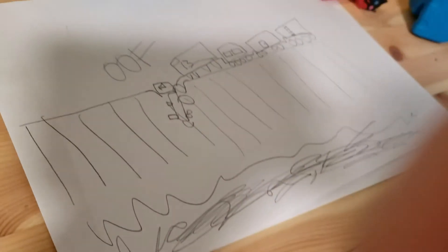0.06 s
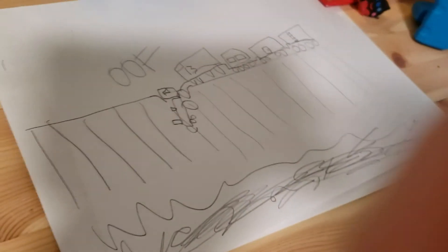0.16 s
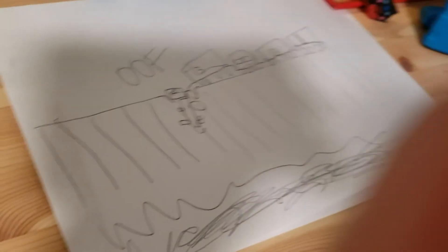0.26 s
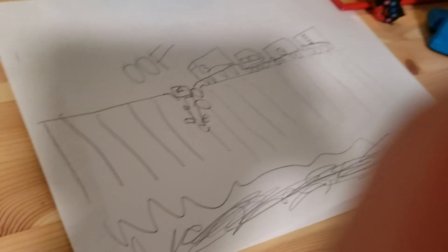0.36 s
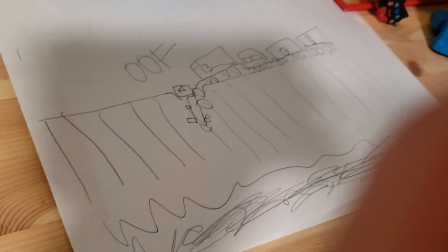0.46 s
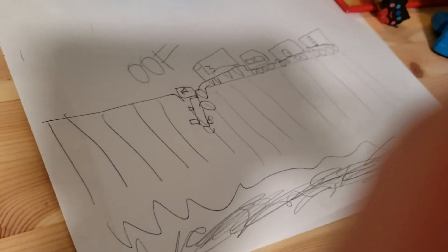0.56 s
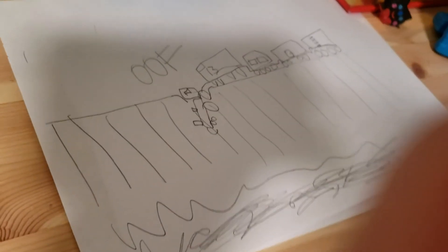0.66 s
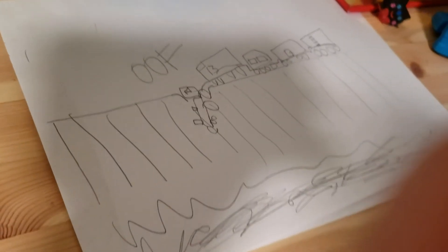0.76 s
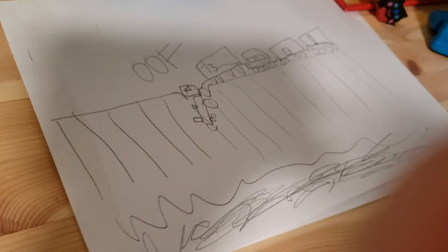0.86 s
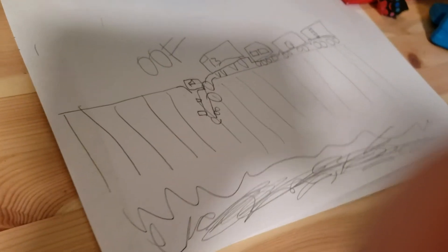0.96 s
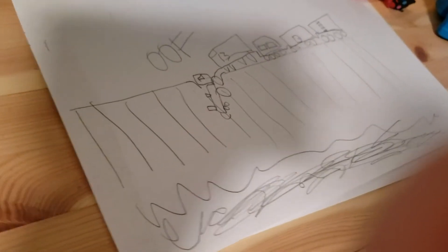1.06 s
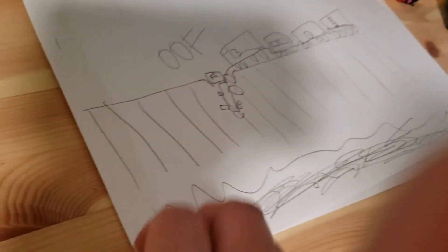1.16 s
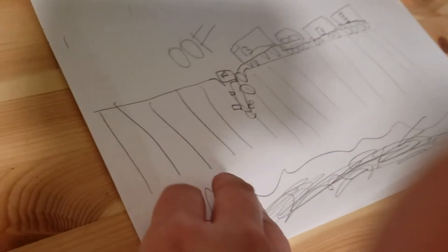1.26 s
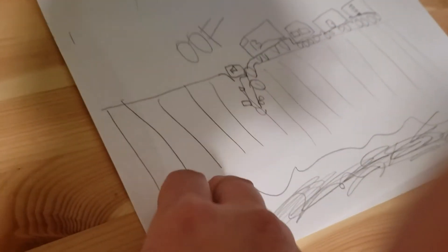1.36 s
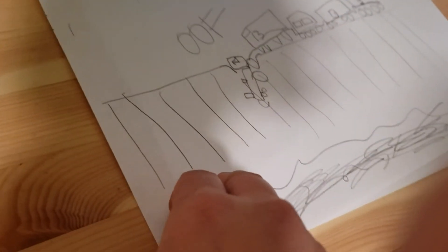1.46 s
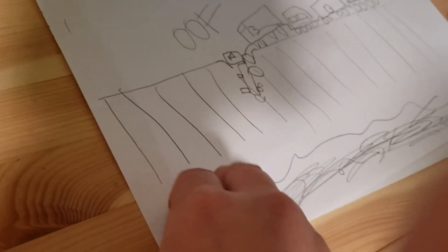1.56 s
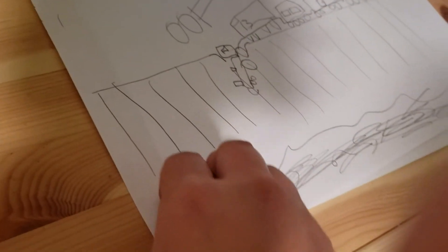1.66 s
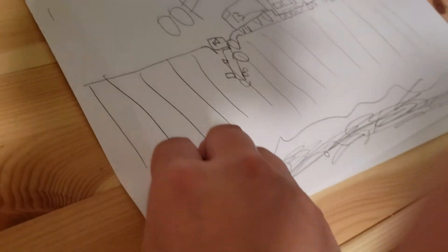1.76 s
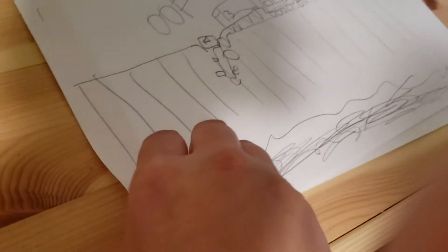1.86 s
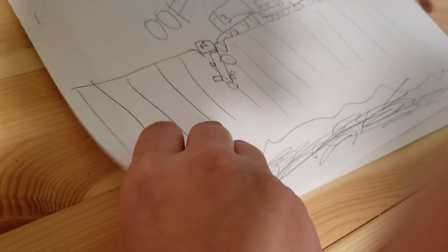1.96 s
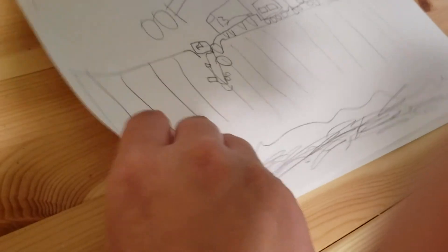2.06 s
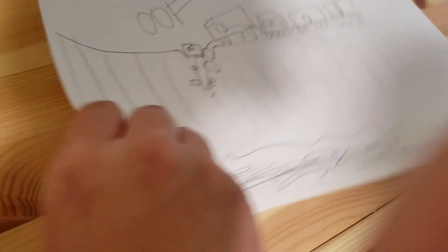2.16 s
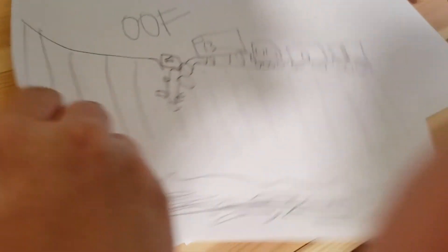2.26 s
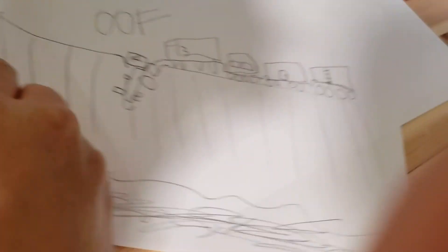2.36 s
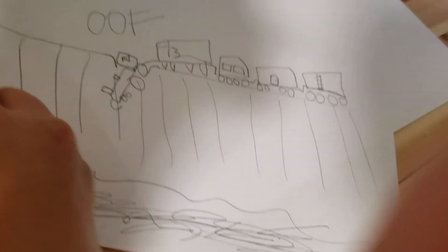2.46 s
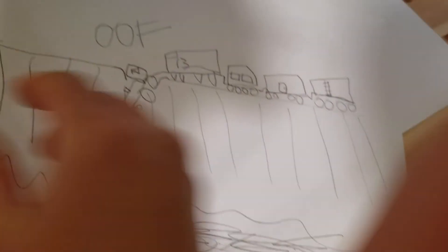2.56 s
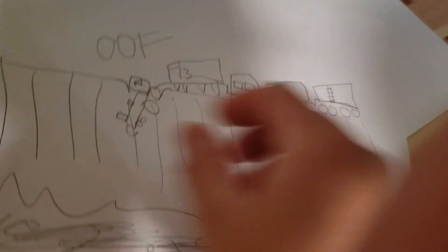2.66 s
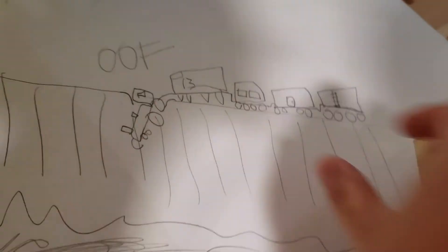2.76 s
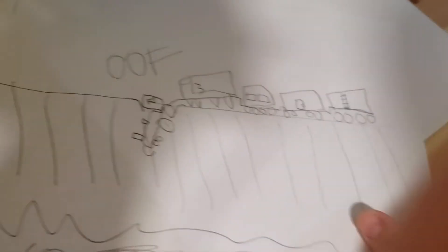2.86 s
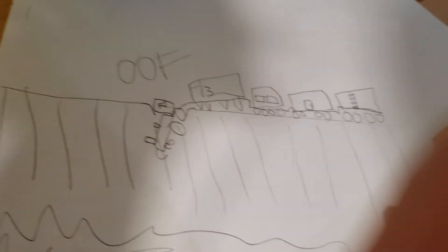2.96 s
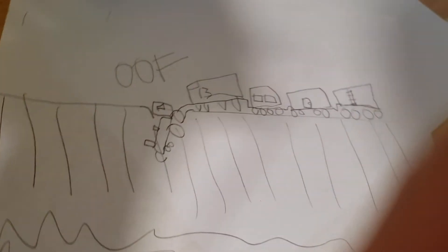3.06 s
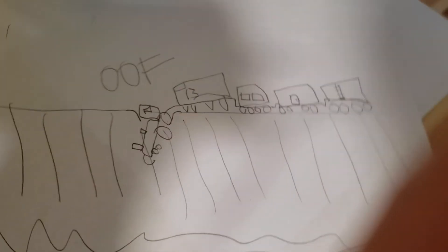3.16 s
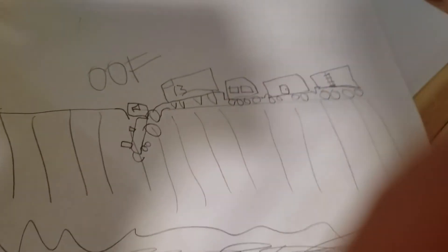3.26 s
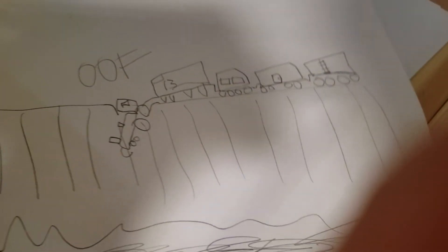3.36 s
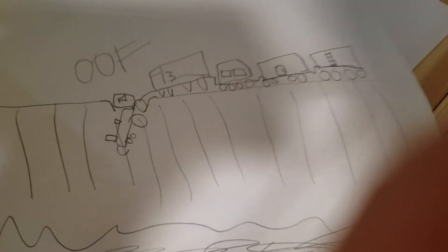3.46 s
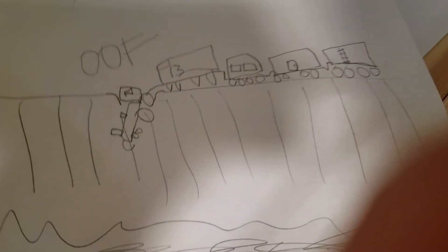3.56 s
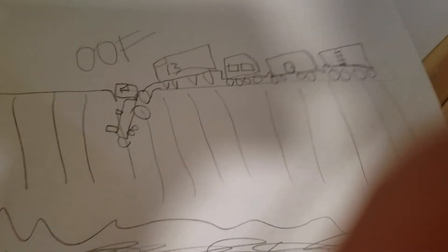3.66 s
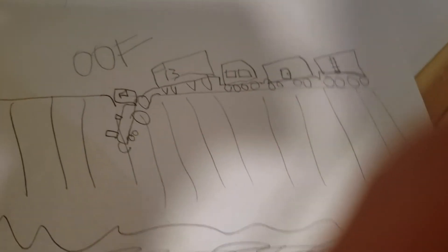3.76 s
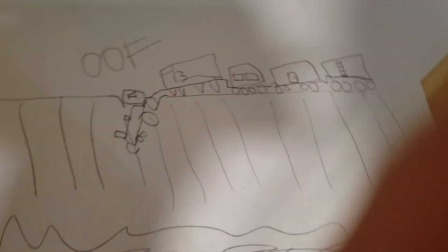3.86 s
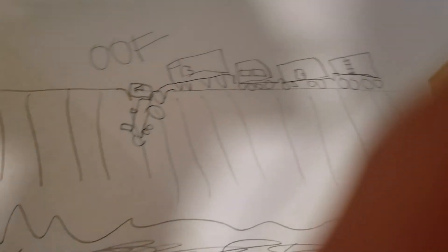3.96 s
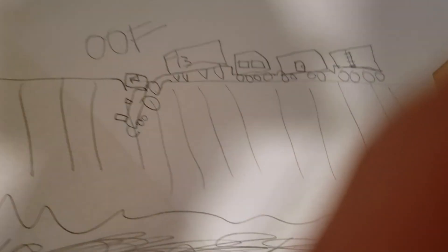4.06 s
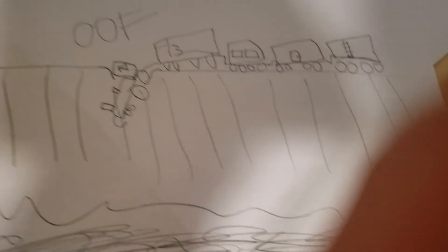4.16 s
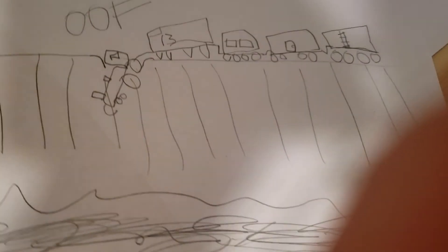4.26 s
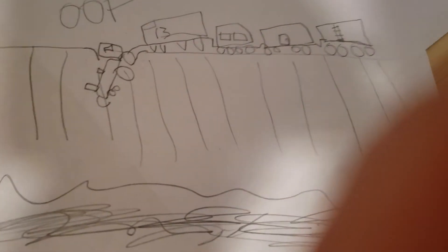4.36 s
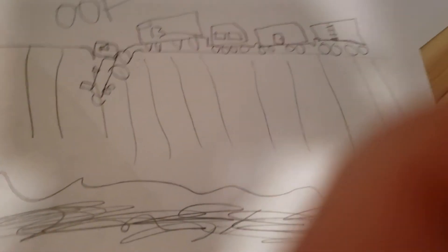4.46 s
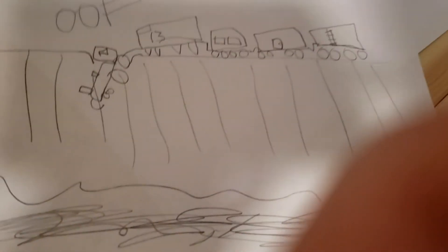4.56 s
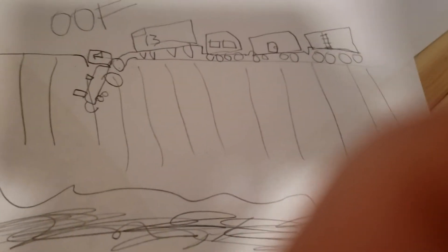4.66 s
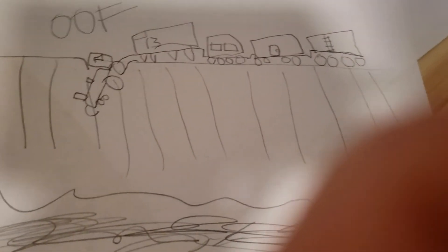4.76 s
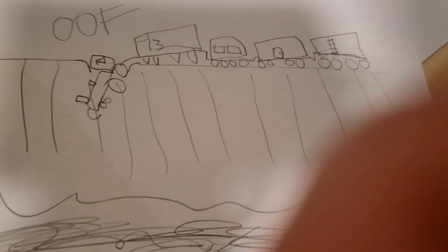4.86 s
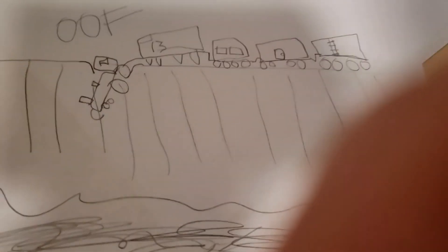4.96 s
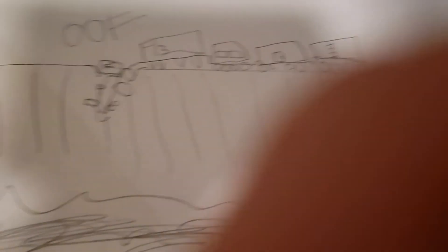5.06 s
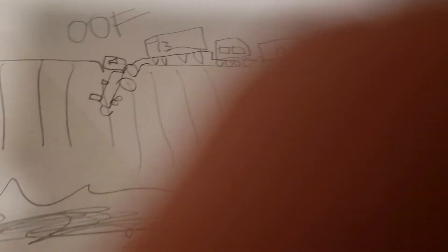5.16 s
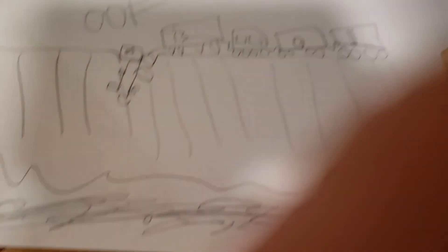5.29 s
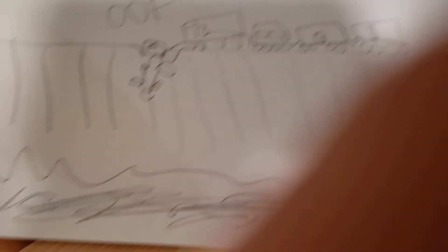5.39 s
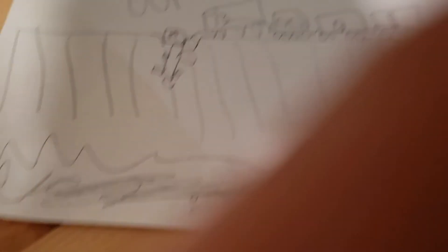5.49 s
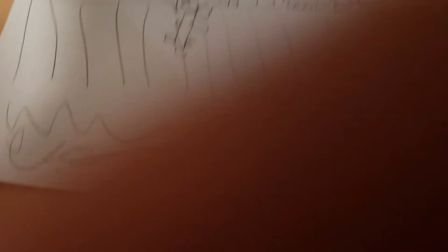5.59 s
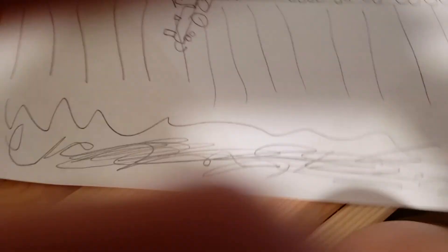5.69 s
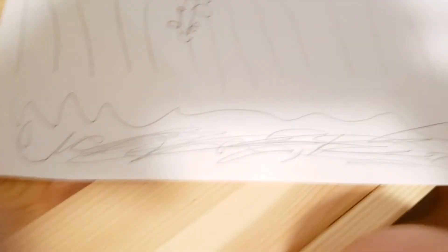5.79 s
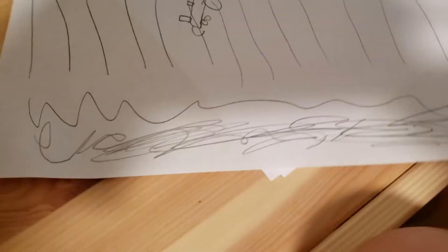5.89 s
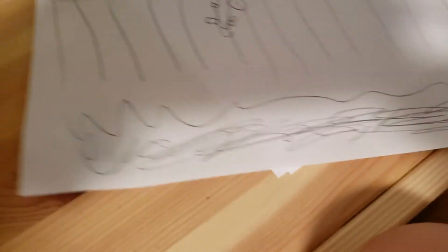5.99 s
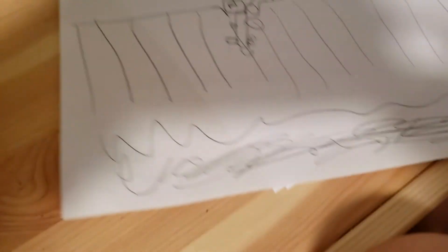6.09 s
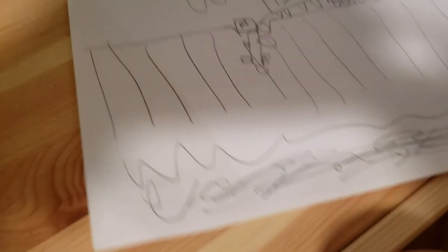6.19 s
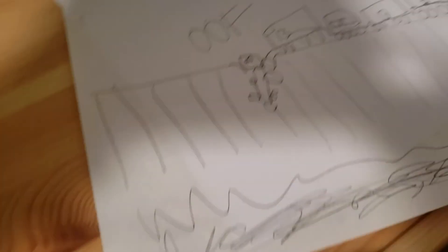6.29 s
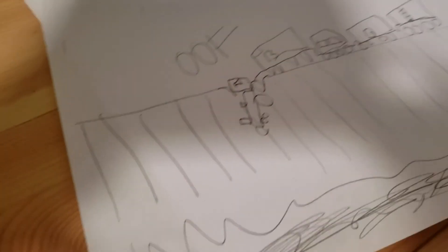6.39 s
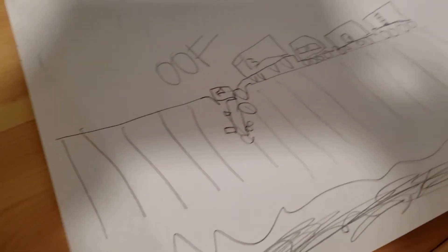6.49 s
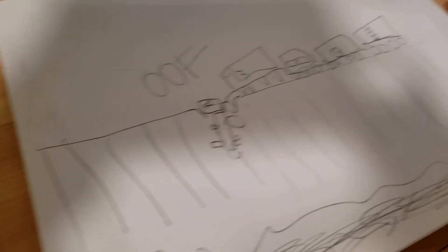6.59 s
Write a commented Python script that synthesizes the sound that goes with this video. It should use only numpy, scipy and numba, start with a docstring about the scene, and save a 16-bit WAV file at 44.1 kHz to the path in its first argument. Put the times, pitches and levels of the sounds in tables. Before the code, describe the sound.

In a quiet room, a sheet of paper lies almost silent on a wooden table, then dull knocks start and the sheet slides. Sharp crisp snaps follow as it is lifted and turned, then softer rubbing. Later come heavy thumps, louder dragging and one strong scrape, with crinkling to the end. Very close hand-held stereo microphone: paper mostly left, grip noises mostly right.

```python
"""In a quiet room a sheet of paper is dragged, lifted and turned on a wooden table, close to a hand-held recorder.
After a faint start, knocks come from 1 s and sharp snaps of the sheet around 2 to 2.6 s; softer rubbing follows.
The heaviest knocks come near 4.7 s, the strongest scrape near 5.7 s, and sliding and crinkling go on to the end.
The left port hears the sheet and fingertips: friction is many tiny clicks, snaps are short noise bursts.
The right port lies under the holding hand: the grip creeps (low friction) and knocks make the case ring."""
import sys
import numpy as np
from scipy import signal
from scipy.fft import rfft, irfft, next_fast_len
from scipy.io import wavfile
from numba import njit

SR = 44100
rng = np.random.default_rng(int(sys.argv[2]) if len(sys.argv) > 2 else 0)


def store_pcm(level_fs):
    """Save levels as 16-bit WAV."""
    pcm = np.round(np.clip(level_fs, -1, 1) * 32767).astype(np.int16)
    wavfile.write(sys.argv[1], SR, np.atleast_2d(pcm).T)


N = 292546   # length in samples
PADDED = next_fast_len(N)
BINS_HZ = np.maximum(np.arange(PADDED // 2 + 1) * SR / PADDED, 1)

# Room tone and microphone hiss: (frequency [Hz], left [dB per Hz], right [dB per Hz])
ROOM_SPECTRUM = [(25, -110, -108), (60, -93, -97.5), (124, -89, -93.5), (246, -88, -89),
                 (378, -94.5, -94.5), (696, -99, -101), (950, -107, -105), (1600, -106, -113),
                 (2780, -113, -118), (5500, -119, -123), (8170, -122, -128), (10940, -120, -116),
                 (14000, -114, -116), (14600, -110, -115)]
# How alike the room is at both ports: (frequency [Hz], likeness [0 to 1])
ROOM_LIKENESS_CURVE = [(60, 0.88), (130, 1), (290, 0.92), (640, 0.32), (1200, 0), (16000, 0.14)]

# Colours of friction, as relative levels: (frequency [Hz], left [dB], right [dB])
# the palm's low rumble
THUD_SPECTRUM = [(25, -49.5, -36), (44.5, -27, 6.5), (63.6, -40, 11), (120, -27, 6.5), (176, -47.5, -2),
                 (300, -50.5, -47.5)]
# the palm's creak
CREAK_SPECTRUM = [(113, -28, 0.5), (221, -23, 7.5), (377, -46, 2), (665, -17.5, -4), (990, -36, -9.5),
                  (1340, -65, -23.5), (2590, -40.5, -66)]
# the whole sheet dragging
DRAG_SPECTRUM = [(60, -43.5, -56.5), (241, -12.5, -30), (347, -1, -30), (415, -0.5, -41.5), (490, 0, -20),
                 (670, 0.5, -38), (776, -2.5, -10.5), (920, -1.5, -15.5), (1280, -11, -32.5),
                 (1830, -40.5, -48)]
# paper and skin scraping
SCRAPE_SPECTRUM = [(895, -27.5, -7.5), (1420, -9.5, -2), (1610, -5, -14.5), (1810, -2.5, 8),
                   (2140, -4, -0.5), (2420, -5, -4.5), (2860, -4.5, 3), (3240, -8.5, 2.5),
                   (3490, -10.5, -6), (3900, -11, -0.5), (4700, -10, -15), (6500, -18, -5),
                   (7880, -49, -33), (12000, -50.5, -53)]
# a fuller rub near the left port
RUB_SPECTRUM = [(647, -16.5, -1.5), (1000, -2.5, 3), (1350, -3, -9.5), (1360, -2.5, -0.5),
                (2170, -1.5, -0.5), (2630, -6, -1.5), (3220, -5.5, -5), (3800, -8.5, -10.5),
                (4860, -7.5, -12), (7000, -15, -25.5), (9000, -23.5, -45.5), (13040, -49, -54.5)]
# bright hiss of tiny creases
HISS_SPECTRUM = [(2500, -39, -48.5), (3170, -7, -21), (3900, -0.5, -16.5), (4970, -2.5, -11.5),
                 (6240, -2, -10), (8800, -1.5, -16.5), (9120, -5.5, -2), (11520, -4.5, 2.5),
                 (13700, -6, -1), (16740, 3, -7)]

# Grip shifting on the case, levels at the louder port; rise and fall span 20 dB:
# (time [s], rise [s], fall [s], thud [dB], creak [dB])
GRIP_SHIFTS = [(.394, 0.033, 0.05, -90, -57.5), (1.019, .003, 0.2, -27, -44.5),
               (1.137, 0.055, 0.068, -34, -32), (1.228, 0.058, 0.0087, -47, -43.5),
               (1.349, 0.0026, 0.097, -39, -62), (1.412, 0.13, .06, -48, -42),
               (1.92, 0.29, 0.12, -77, -49.5), (2.15, .004, 0.13, -43, -44), (2.36, 0.025, .08, -41, -58),
               (2.439, .15, 0.089, -56, -36.5), (2.553, 0.087, 0.035, -49, -42.5),
               (2.684, 0.0036, 0.046, -40, -64), (2.719, 0.026, 0.053, -56, -37.5),
               (2.943, 0.022, 0.067, -73, -51), (3.55, 0.21, .05, -66, -55),
               (3.622, 0.21, 0.079, -53.5, -41.5), (3.745, 0.064, 0.065, -33.5, -26),
               (4.076, .04, 0.025, -62, -68), (4.161, 0.057, .25, -62, -56.5), (4.34, .07, .17, -62, -56.5),
               (4.495, 0.035, 0.11, -64, -59), (4.599, 0.0032, 0.032, -36, -37),
               (4.672, 0.0027, 0.019, -45, -20), (4.737, 0.005, 0.043, -49, -31.5),
               (4.845, .15, 0.018, -42.5, -49.5), (4.937, 0.056, 0.15, -44, -41.5),
               (5.113, 0.045, .05, -42.5, -60), (5.228, 0.043, 0.23, -53, -53),
               (5.387, 0.072, .15, -41, -42), (5.597, .15, 0.079, -51, -63), (5.667, .035, .3, -45, -54),
               (5.78, .1, 0.33, -55, -52), (6.246, 0.19, 0.18, -67, -57.5), (6.465, 0.21, .18, -64, -54),
               (6.56, .004, 0.082, -44, -45.5)]
RESTING_THUD_DB, RESTING_CREAK_DB = -80.5, -80.5

# Knocks on the case, strengths of the striking clicks; each mode group adds its own offset to the left:
# (time [s], thud [dB], bump [dB], knock [dB], crack [dB], left above right [dB],
#  direction of the first swing [+1 or -1])
CASE_KNOCKS = [(1.0252, -25, -10, -59, -60, -31, 1), (1.0626, -35, -46, -15.5, -25, -28, 1),
               (1.0825, -16.5, -32, -45, -60, -26, -1), (1.113, -26, -18.5, -29.5, -46, -20, 1),
               (1.1322, -44, -35, -27.5, -52, -16, 1), (1.14, -34, -43, -39, -55, -14, -1),
               (1.22, -43, -39, -36.5, -53, -16, 1), (1.3464, -34, -65, -22, -19.5, -19, 1),
               (1.383, -47, -51, -36, -50, -8, 1), (2.1501, -44, -53, -32.5, -55, -15, 1),
               (2.1562, -44, -20, -53, -62, -18, -1), (2.372, -57, -52, -22.5, -50, -10, 1),
               (2.6788, -48, -52, -20.5, -46, -12.5, 1), (2.934, -65, -33, -59, -47.5, 6, 1),
               (4.6, -39, -38, -45, -25, -11, 1), (4.672, -30, -3.5, -47, -8.5, -36, 1),
               (4.681, -51, -40, -25, -27, -6, 1), (4.6886, -14.5, -17, -52, -60, -22, 1),
               (4.737, -3.5, -8, -46, -17, -24, -1), (4.937, -18, -20.5, -36, -17, -27, -1),
               (5.379, -39, -47, -42, -47, 4, -1), (6.561, -23, -49, -52, -43, -12, -1)]
# Ringing modes of the case, slow to quick: (frequency [Hz], relative level [dB], time to fall 60 dB [s])
THUD_MODES = [(62.4, -2, 0.069)]
# bump modes, same columns
BUMP_MODES = [(188, 0, 0.016)]
# knock modes, same columns
KNOCK_MODES = [(340, 1.5, 0.027), (466, 0, 0.031), (734, -4.5, 0.026)]
# crack modes, same columns
CRACK_MODES = [(520, 0, 0.0056)]
# tick modes, same columns
TICK_MODES = [(1350, 0, 0.0086), (2250, 8.5, 0.0031), (3940, -14, 0.0053), (5700, -9, 0.0023)]
TICK_DB, TICK_PER_CRACK_DB = -28.5, 0.62   # tick level for a 0 dB crack; tick dB gained per crack dB
FAR_PORT_LAG_S = 0.0013

# Fingernail taps near the left port, click strengths: (time [s], left [dB], right above left [dB])
NAIL_TAPS = [(4.0573, -23, -22), (5.0332, -28.5, -22), (5.729, -18, -32), (6.558, -26.5, -23)]

# Short noise bursts: snaps of the sheet, two of them as the sheet jolts with the knocks near 4.7 s; # the left
# port gets 3 dB on top of these: # (time [s], treble [dB], body above treble [dB], time to fall 60 dB [s], left
# above right [dB])
NOISE_BURSTS = [(1.0167, -51.5, -8, 0.023, 8), (1.968, -25, -16, 0.018, 0), (1.9813, -28.5, -36, 0.062, 3),
                (2.0281, -18, -14, 0.014, 11), (2.0356, -12, -12.5, 0.018, 0.5),
                (2.0482, -37, -13, 0.026, -12), (2.0542, -46, 9, 0.016, 16), (2.3349, -29, -8.5, 0.059, 4),
                (2.416, -51.5, 10, 0.035, -2), (2.4824, -26.5, -8.5, 0.015, 7), (2.497, -36, 3, 0.019, 3.0),
                (2.5614, -18, -21, 0.024, 5.5), (2.592, -32, -15, 0.06, 15), (2.9363, -43, 4, 0.018, 1),
                (2.9642, -53, -22, 0.017, 1), (3.187, -44, -20, 0.057, 0), (3.4339, -46, -15, 0.053, -1),
                (4.387, -60, 8, 0.031, 23), (4.5345, -46.5, 5.5, 0.044, 21), (4.582, -41.5, 2, 0.063, 12),
                (4.6715, -50, 3, 0.012, -6), (4.7367, -53, 3.5, 0.016, -6), (4.985, -48, 10, 0.078, 8),
                (5.2713, -48, 4, 0.039, 22.0), (5.3774, -51, 16, 0.056, 24), (6.556, -47.5, 12, 0.053, 18),
                (6.586, -47.5, 7.5, 0.02, -1)]

# Strokes of sheet and fingers, levels before resonance, echo and flicker; rise and fall span 20 dB:
# (time [s], rise [s], fall [s], hold [s], scrape [dB], drag [dB], hiss [dB],
#  scrape right above left [dB], hiss right above left [dB])
SHEET_STROKES = [(.05, 0.11, .35, 0.074, -96, -96, -66.5, -4, 10),
                 (0.865, .1, 0.26, .03, -96, -96, -87, -4, 21),
                 (1.061, 0.032, 0.066, 0, -51.5, -46, -58.5, -12, 0),
                 (1.16, 0.11, .09, 0.021, -56.5, -54.5, -69, -12, 11),
                 (1.286, .04, 0.11, 0, -85, -80, -73, -10, 17),
                 (1.352, 0.021, 0.14, 0.0075, -57, -51, -71.5, -10, 13),
                 (1.47, .15, .1, 0.24, -58, -61.5, -68, -12, 2.5),
                 (1.774, 0.053, .1, 0.32, -53.5, -60, -50, -9.5, -3.5),
                 (1.959, 0.12, 0.12, 0.01, -49, -53.5, -39, -13, 1),
                 (2.033, 0.01, 0.034, 0.0059, -32.5, -41, -37, -17.5, 13.5),
                 (2.085, 0.18, 0.43, 0.17, -49.5, -63.5, -42.5, -15, 2.5),
                 (2.343, 0.055, 0.11, 0.013, -38.5, -60, -30, -11.5, -1),
                 (2.386, 0.039, 0.11, 0.047, -57, -42.5, -39.5, -11, 5),
                 (2.485, 0.078, 0.067, 0.024, -41, -56, -33.5, -11, -0.5),
                 (2.557, 0.027, 0.043, 0.048, -42.5, -65, -42, -12, -1),
                 (2.688, 0.036, 0.074, 0.017, -72, -52, -75, -10, 13),
                 (2.77, 0.095, 0.057, 0, -90, -82, -65, -10, 14.5),
                 (2.938, .01, .04, 0.0053, -44.5, -49, -47, -3.5, 0),
                 (2.967, 0.0093, 0.095, 0, -53, -60.5, -41.5, -10, -2.5),
                 (3.01, 0.11, .1, 0.34, -85, -99, -54.5, -15, 2.5),
                 (3.198, 0.054, 0.13, 0.095, -56.5, -69.5, -53.5, -18, -3),
                 (3.358, 0.07, 0.052, 0.034, -56.5, -75, -49.5, -16, 3.5),
                 (3.485, 0.05, 0.087, 0.13, -59, -64.5, -58, -20, 3.5),
                 (3.615, 0.21, .08, 0.01, -52, -67, -47, -10, -4.5),
                 (3.751, 0.06, 0.094, 0, -50.5, -40.5, -46.5, -2.5, -5),
                 (3.788, 0.11, .1, 0.33, -55.5, -66, -67, -2.5, 5),
                 (4.101, 0.12, 0.053, 0.15, -43.5, -58, -54.5, -13.5, -5.5),
                 (4.149, 0.06, 0.11, .02, -40.5, -57, -44.5, -11, -15),
                 (4.304, .1, .2, 1.3, -96, -96, -85, -4, 17),
                 (4.395, 0.0091, 0.042, 0.113, -48, -60, -57, -20.5, 0),
                 (4.534, 0.024, 0.037, 0.042, -47.5, -49.5, -59, -25, 9.5),
                 (4.497, 0.11, .02, 0.0049, -41, -45.5, -43.5, -25.5, -19),
                 (4.589, 0.017, 0.024, 0.0032, -37, -39.5, -41.5, -23.5, -5),
                 (4.67, 0.043, 0.023, 0.035, -54.5, -58, -65, -12, 8),
                 (4.731, .04, 0.035, 0.095, -52.5, -58, -69.5, -10.5, 7.5),
                 (4.914, 0.031, .035, 0.034, -49.5, -54, -70, -17, 11),
                 (4.85, 0.036, .03, 0.015, -49, -56, -64, -16, 7),
                 (4.973, 0.026, .1, 0.092, -42, -46, -57.5, -22, -1),
                 (5.153, .12, 0.064, 0.02, -32, -37.5, -37, -23, -15),
                 (5.226, 0.032, 0.021, 0, -35.5, -32.5, -46, -22, -5),
                 (5.303, 0.06, 0.066, 0.0012, -32, -38, -42.5, -21.5, -12),
                 (5.386, 0.018, 0.028, 0.0098, -37.5, -40, -50, -22, -4),
                 (5.446, .05, 0.032, .03, -45, -49, -63, -24.5, 0),
                 (5.597, 0.077, 0.013, 0.43, -35.5, -41.5, -38.5, -32, -18),
                 (5.745, .13, 0.21, 0.055, -19.5, -34.5, -27.5, -28, -16),
                 (5.997, 0.13, 0.087, 0.071, -42.5, -46, -40, -20.5, -3.5),
                 (6.197, 0.1, 0.11, 0.071, -45, -57, -45.5, -22.5, 0),
                 (6.332, 0.038, 0.062, 0.063, -29.5, -36, -39, -37, -7),
                 (6.392, .05, 0.022, 0.098, -40.5, -38, -49, -40, -5),
                 (6.561, 0.026, 0.047, 0, -49, -43, -56, -46, 7),
                 (6.63, 0.089, .1, 0.0025, -44, -55, -45, -13, -6)]
# Gain of the hiss above 9300 Hz at the left port, before its flicker: (time [s], gain [dB])
TOP_TREBLE = [(0, 15), (.4, 3), (1.7, 1.5), (2.9, 1), (3.6, -.5), (4.0, -21), (4.3, -10), (4.5, -26),
              (4.6, -18), (4.9, -18), (5.2, -13), (5.55, -18), (5.7, 2), (5.8, -1.5), (5.88, -3),
              (6.0, -6.5), (6.3, 4.8), (6.63, -2)]
# The bent sheet sings in one band that moves as it flexes; the left port gets 0.5 dB more:
# (time [s], band centre [Hz], strength [dB])
FLEX_BAND = [(0, 1600, -35), (1.47, 1510, 10), (1.68, 1610, 2), (1.9, 1570, -23), (2.05, 3870, 14.5),
             (2.6, 3760, 9), (2.95, 3420, -10), (3.7, 2280, -8), (3.9, 2300, 6.5), (4.2, 2150, -14.5),
             (4.3, 2290, -38), (4.4, 4470, 8.5), (4.55, 4870, 1), (4.6, 1790, -26), (5.14, 2700, 1.5),
             (5.24, 2400, -18), (5.3, 4800, -6), (5.45, 2280, -51), (5.78, 1270, -0.5), (5.95, 1230, 2),
             (6.03, 2580, -26), (6.08, 2660, 12.5), (6.28, 2040, -18), (6.37, 1116, 10.5),
             (6.63, 1120, -10)]
FLEX_WIDTH_HZ, FLEX_WIDENS = 200, 0.094   # band width = this + share of the centre
TABLE_HZ, TABLE_WIDTH_HZ, TABLE_DB = 450, 26, 6.5
TABLE_ECHO_S, TABLE_ECHO_DB = 0.001293, -7   # the mean delay, and the level of the echo


def amp(db):
    """Turn a level in dB into a gain."""
    return 10 ** (np.asarray(db) / 20)


def rms_one(x):
    """Scale each channel to rms 1."""
    return x / np.sqrt(np.mean(x ** 2, axis=-1, keepdims=True) + 1e-20)


def in_time(rows):
    """Draw each column of a curve over time, one value a sample."""
    s, *columns = np.transpose(rows)
    return [np.interp(np.arange(N) / SR, s, c) for c in columns]


def on_bins(points):
    """Draw each column of a spectrum over log frequency, one value a frequency bin."""
    hz, *columns = np.transpose(points)
    return np.array([np.interp(np.log(BINS_HZ), np.log(hz), c) for c in columns])


def colour(x, spectrum):
    """Filter both channels, each with its own spectrum."""
    return irfft(rfft(x, PADDED) * amp(on_bins(spectrum)), PADDED)[:, :N]


def drift(rate_hz):
    """Make a slow random wander with spread 1: noise smoothed twice, at a twentieth of the sample rate."""
    r = np.exp(-40 * np.pi * rate_hz / SR)
    noise = rng.standard_normal(N // 20 + 2002)
    slow = signal.lfilter([1], [1, -2 * r, r * r], noise)[2000:]   # skip the filter's start
    return np.interp(np.arange(N) / 20, np.arange(len(slow)), rms_one(slow))


def friction(spectrum, per_s, uneven_db, flicker_db, flicker_hz, shared=0):
    """Fibres catch and let go: uneven clicks under a flickering pressure; a share reaches both ports."""
    born = rng.random((2, N)) < per_s / SR
    unevenness = np.minimum(rng.exponential(1, (2, N)), 3)
    clicks = born * amp(uneven_db * unevenness) * rng.standard_normal((2, N))
    from_right = np.roll(clicks[1], round(FAR_PORT_LAG_S * SR))
    clicks[0] = shared * from_right + np.sqrt(1 - shared ** 2) * clicks[0]
    sound = colour(rms_one(clicks), spectrum) * amp(flicker_db * drift(flicker_hz))
    return sound / np.sqrt(np.mean(sound ** 2, axis=1)).max()   # the louder port gets rms 1


def ring(clicks, modes, contact_hz):
    """A soft contact (double low-pass) sets modes ringing, neighbours in opposite sense, so that they beat."""
    p = np.exp(-2 * np.pi * contact_hz / SR)
    push = signal.lfilter([(1 - p) ** 2], [1, -2 * p, p * p], clicks + 1e-18)
    out = 0
    for k, (hz, level_db, t60) in enumerate(modes):
        r = amp(-60 / (t60 * SR))   # loss per sample
        w = 2 * np.pi * hz / SR
        mode = signal.lfilter([0, np.sin(w)], [1, -2 * r * np.cos(w), r * r], push)
        out = out + (-1) ** k * amp(level_db) * mode
    return out


@njit
def moving_band(x, hz, width_hz):
    """A resonance of gain 1 whose centre and width can change from sample to sample."""
    out = np.zeros_like(x)
    for c in range(2):
        for i in range(2, x.shape[1]):
            r = np.exp(-np.pi * width_hz[i] / SR)
            drive = (1 - r * r) / 2 * (x[c, i] - x[c, i - 2])
            swing = 2 * r * np.cos(2 * np.pi * hz[i] / SR) * out[c, i - 1]
            out[c, i] = drive + swing - r * r * out[c, i - 2]
    return out


def swells(s, rise_s, fall_s, hold_s, *levels_db):
    """Events rise, hold and fall along straight lines in dB; powers add. One gain curve per level column."""
    t = np.arange(0, N + 32, 32) / SR   # one point every 32 samples
    early = (s[:, None] - t).clip(0)
    late = (t - (s + hold_s)[:, None]).clip(0)
    shape_db = -20 * (early / rise_s[:, None] + late / fall_s[:, None])
    power = amp(2 * np.array(levels_db)) @ amp(2 * shape_db.clip(-150)) + 1e-30
    return [np.interp(np.arange(N) / SR, t, p) for p in np.sqrt(power)]


def stroke_gains():
    """Gains of scrape left and right, drag, hiss left and right under all strokes."""
    (s, rise_s, fall_s, hold_s, scrape_db, drag_db, hiss_db,
     right_db, hiss_right_db) = np.transpose(SHEET_STROKES)
    return swells(s, rise_s, fall_s, hold_s, scrape_db, scrape_db + right_db,
                  drag_db, hiss_db, hiss_db + hiss_right_db)


def patchy(x):
    """Make a sound uneven: three bands, each with its own slow random gain."""
    low, high = (signal.sosfilt(signal.butter(2, hz, "low", fs=SR, output="sos"), x) for hz in (4800, 9600))
    return sum(band * amp(1.62 * drift(11.2)) for band in (low, high - low, x - high))


def table_echo(x):
    """The table top throws the sound back a moment later; the path wavers, so the comb of bands shifts."""
    late = np.arange(N) - TABLE_ECHO_S * SR * (1 + 0.063 * drift(1.2))
    return x + amp(TABLE_ECHO_DB) * np.array([np.interp(late, np.arange(N), c) for c in x])


def room():
    """Steady room tone and microphone hiss: noise that is most alike at both ports in the bass."""
    mid, side = rfft(rng.standard_normal((2, PADDED))) * np.sqrt(SR) / 2
    alike = on_bins(ROOM_LIKENESS_CURVE)[0]
    ports = np.sqrt(1 + alike) * mid + np.sqrt(1 - alike) * side * [[1], [-1]]
    return irfft(ports * amp(on_bins(ROOM_SPECTRUM)), PADDED)[:, :N] * amp(0.5 * drift(10.0))


def grip():
    """The palm creeps on the case: friction as a lumpy rumble and a creak, fainter at the far port."""
    s, rise_s, fall_s, thud_db, creak_db = np.transpose(GRIP_SHIFTS)
    thud_gain, creak_gain = swells(s, rise_s, fall_s, 0, thud_db, creak_db)
    thud = friction(THUD_SPECTRUM, per_s=760.0, uneven_db=2.5, flicker_db=1.5, flicker_hz=6.1, shared=0.6)
    creak = friction(CREAK_SPECTRUM, per_s=1500.0, uneven_db=0.0, flicker_db=1.5, flicker_hz=25.0, shared=1.0)
    return (thud_gain + amp(RESTING_THUD_DB)) * thud + (creak_gain + amp(RESTING_CREAK_DB)) * creak


def knocks():
    """Each knock strikes the modes of the case; the far port hears it later, with the slow modes weakened."""
    s, thud_db, bump_db, knock_db, crack_db, left_db, swing = np.transpose(CASE_KNOCKS)
    tick_db = TICK_DB + TICK_PER_CRACK_DB * crack_db
    at = (s * SR).astype(int)
    # (modes, strength [dB], direction, left port offset [dB], contact low-pass [Hz])
    groups = ((THUD_MODES, thud_db, -swing, -10, 400),   # the slow thud swings the other way
              (BUMP_MODES, bump_db, swing, -8, 1200),
              (KNOCK_MODES, knock_db, swing, 0, 1500),
              (CRACK_MODES, crack_db, swing, 0, 5000),
              (TICK_MODES, tick_db, swing, 6, 8000))
    out = np.zeros((2, N))
    for modes, level_db, direction, far_db, contact_hz in groups:
        clicks = np.zeros((2, N))
        clicks[0, at + round(FAR_PORT_LAG_S * SR)] = direction * amp(level_db + left_db + far_db)
        clicks[1, at] = direction * amp(level_db)
        out += ring(clicks, modes, contact_hz)
    return out


def taps():
    """A fingernail tap is a short hard click that rings only the quick modes of the case."""
    s, level_db, right_db = np.transpose(NAIL_TAPS)
    clicks = np.zeros((2, N))
    clicks[:, (s * SR).astype(int)] = amp([level_db, level_db + right_db])
    return ring(clicks, TICK_MODES, contact_hz=8000)


def snaps():
    """A buckling crease or a jolt of the sheet: a noise burst that starts at once and quickly dies away."""
    treble, body = np.zeros((2, N)), np.zeros((2, N))
    t = np.arange(3000) / SR
    for s, treble_db, body_db, t60, left_db in NOISE_BURSTS:
        i = int(s * SR)
        attack = np.minimum(t / 0.00021, 1)
        shape = (attack * amp(-60 * t / t60))[:N - i]
        ports = amp([[3], [-left_db]]) * shape
        treble[:, i:i + len(t)] += amp(treble_db) * ports
        body[:, i:i + len(t)] += amp(treble_db + body_db) * ports
    noise = rng.standard_normal((2, 2, N))
    bright = rms_one(colour(noise[0], HISS_SPECTRUM))
    full = rms_one(colour(noise[1], SCRAPE_SPECTRUM))
    return treble * bright + body * full


def crinkle():
    """Tiny creases give way in a dense, uneven bright hiss, made of many small clicks."""
    hiss = friction(HISS_SPECTRUM, per_s=16000.0, uneven_db=1.0, flicker_db=1.0, flicker_hz=34.8)
    edge_hz = 9300
    below = signal.sosfilt(signal.butter(4, edge_hz, "low", fs=SR, output="sos"), hiss[0])
    above = signal.sosfilt(signal.butter(4, edge_hz, "high", fs=SR, output="sos"), hiss[0])
    left = below + amp(in_time(TOP_TREBLE)[0] + 0.67 * drift(29.0)) * above
    return stroke_gains()[3:] * patchy(np.array([left, hiss[1]]))


def slide():
    """Paper and skin rub along: a scrape coloured by the flexing sheet and, lower, the whole sheet's drag."""
    left, right, drag_gain = stroke_gains()[:3]
    right_db = 20 * np.log10(right / left)
    scrape = friction(SCRAPE_SPECTRUM, per_s=9000.0, uneven_db=0.5, flicker_db=1.5, flicker_hz=40.5)
    rub = friction(RUB_SPECTRUM, per_s=14000.0, uneven_db=1.2, flicker_db=.8, flicker_hz=60.0)
    drag = friction(DRAG_SPECTRUM, per_s=6000.0, uneven_db=1.5, flicker_db=1.2, flicker_hz=30.0)
    # the more one-sided, the nearer the left port: a fuller rub
    close = np.clip((-right_db - 16.5) / 8.7, 0, 1)
    # the table top hums under the far sheet
    board = moving_band(drag, np.full(N, TABLE_HZ), np.full(N, TABLE_WIDTH_HZ))
    drag = drag + amp(TABLE_DB) * (1 - close) * board
    contact = np.sqrt(1 - close) * table_echo(scrape) + np.sqrt(close) * rub
    centre_hz, sing_db = in_time(FLEX_BAND)
    singing = moving_band(contact, centre_hz, FLEX_WIDTH_HZ + FLEX_WIDENS * centre_hz)
    contact = contact + amp([sing_db + 0.5, sing_db]) * singing
    return [left, right] * contact + drag_gain * drag


def scene():
    """Add up all sources at the two ports."""
    return room() + grip() + knocks() + taps() + snaps() + crinkle() + slide()


def record(dry):
    """The microphones lose the deepest bass; the top is cut steeply, 70 dB down from 16350 Hz."""
    thin = signal.sosfilt(signal.butter(5, 38.0, "high", fs=SR, output="sos"), dry)
    return signal.sosfilt(signal.cheby2(14, 70, 16350, fs=SR, output="sos"), thin)


dry = scene()
out = record(dry)
store_pcm(out)
```